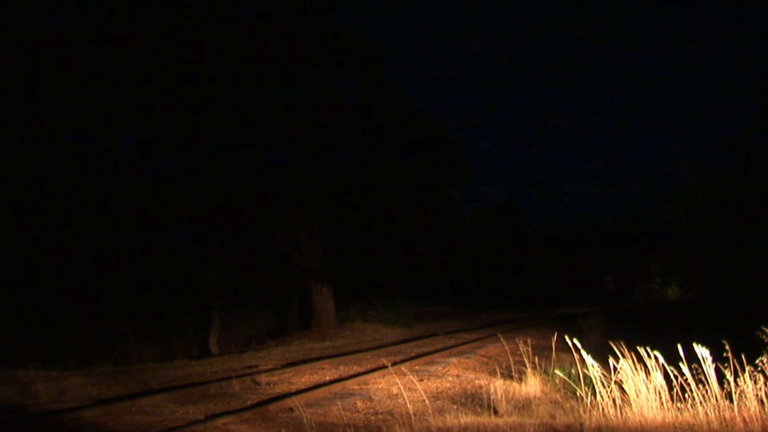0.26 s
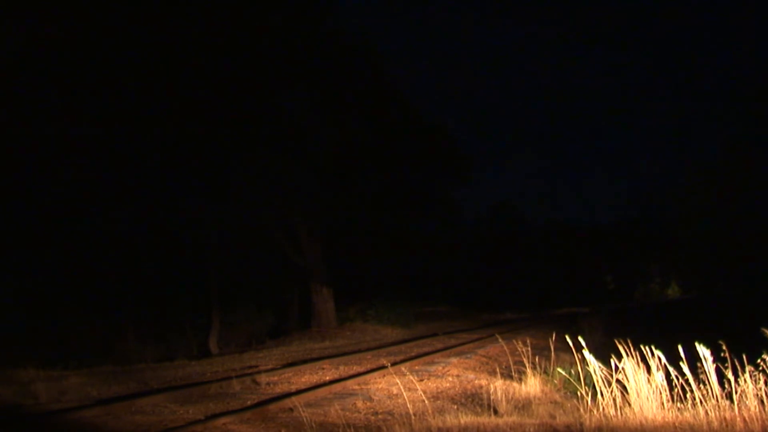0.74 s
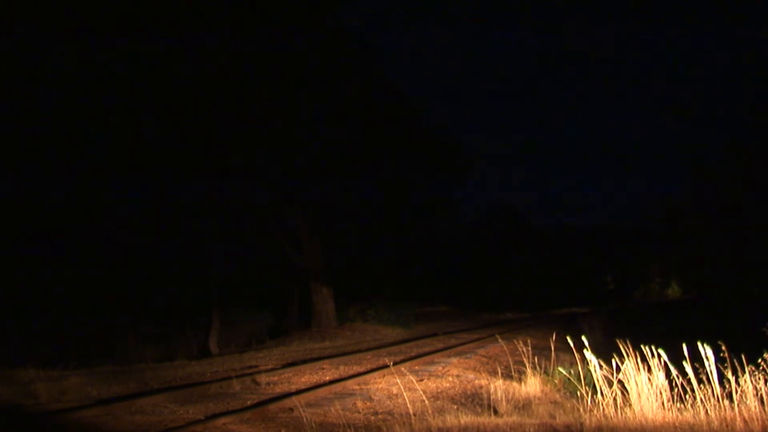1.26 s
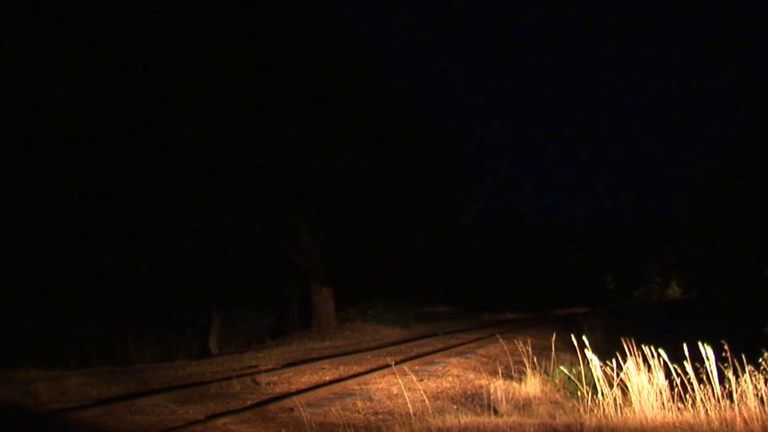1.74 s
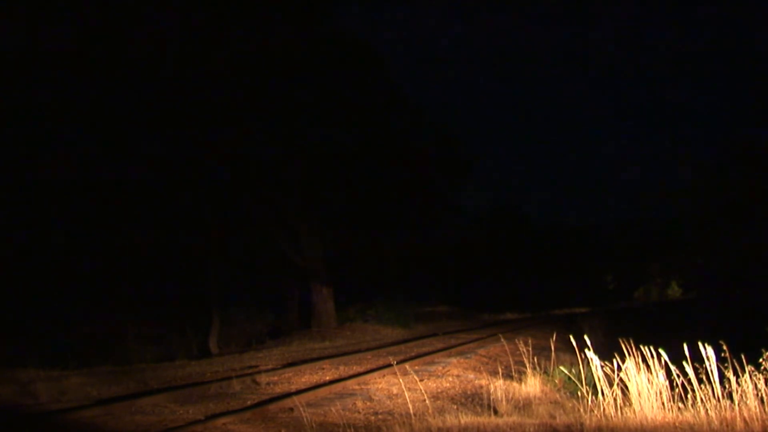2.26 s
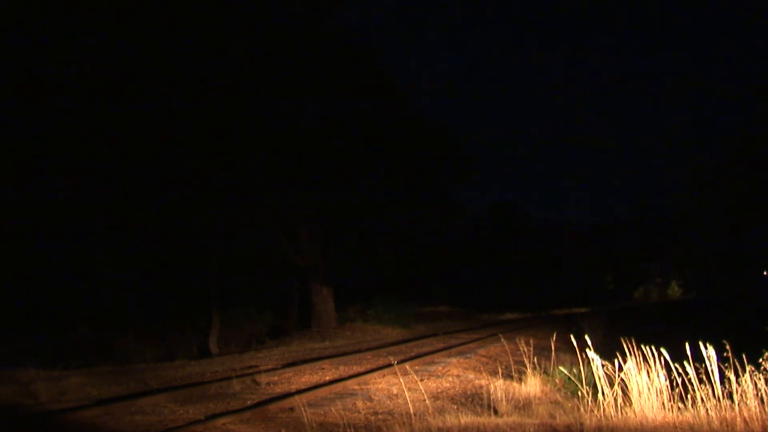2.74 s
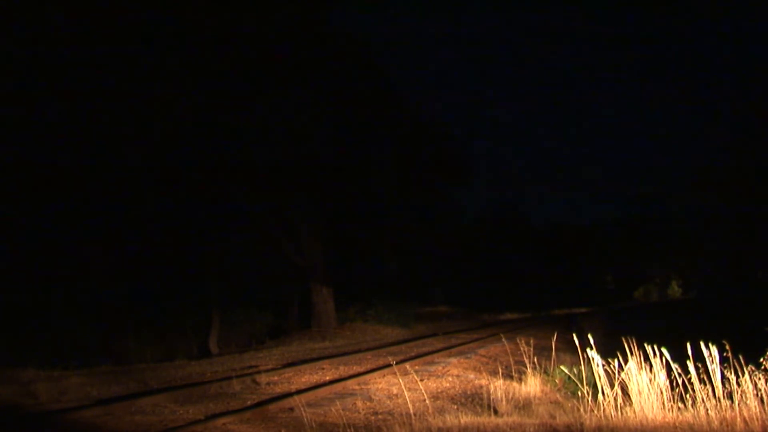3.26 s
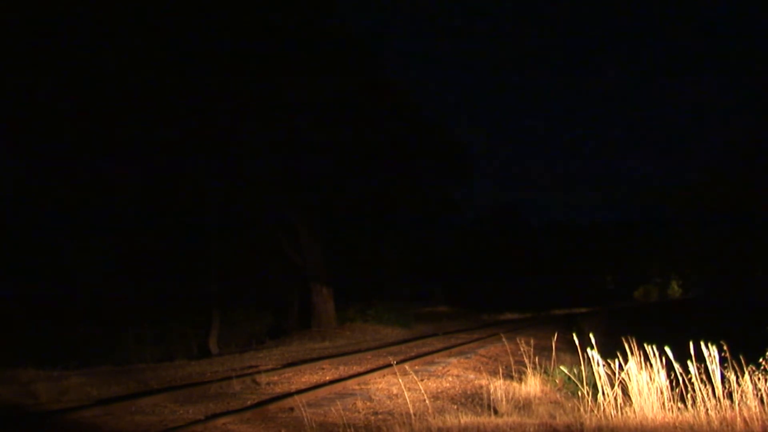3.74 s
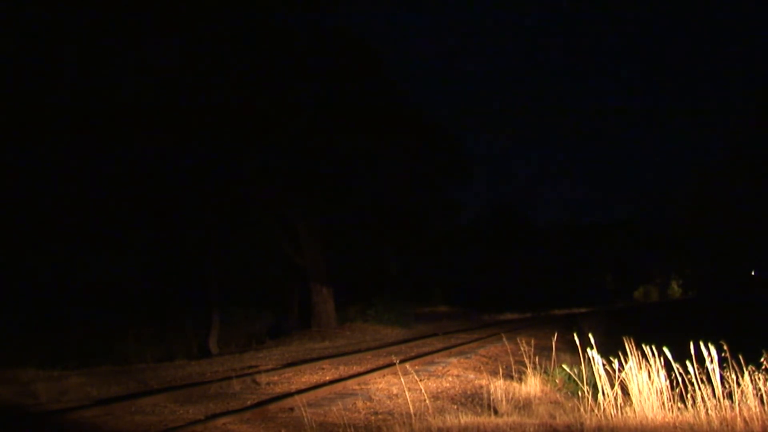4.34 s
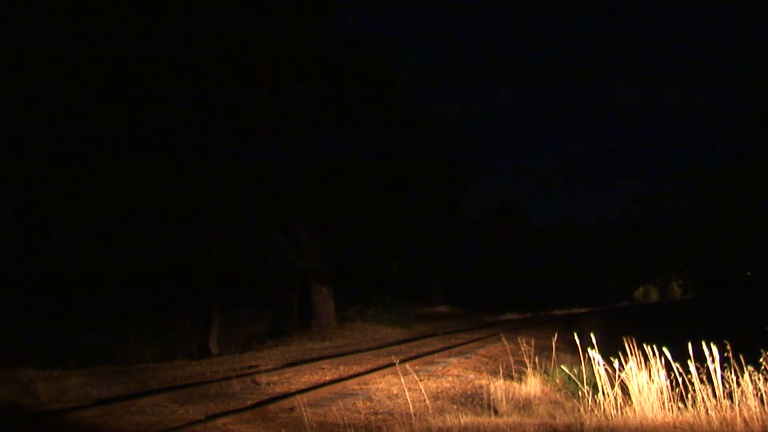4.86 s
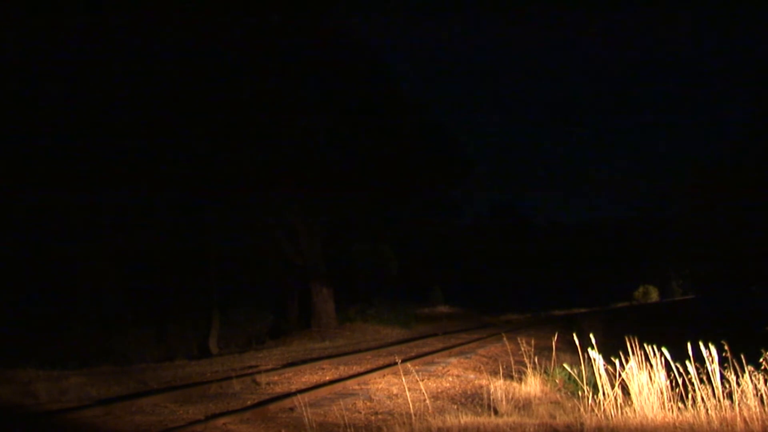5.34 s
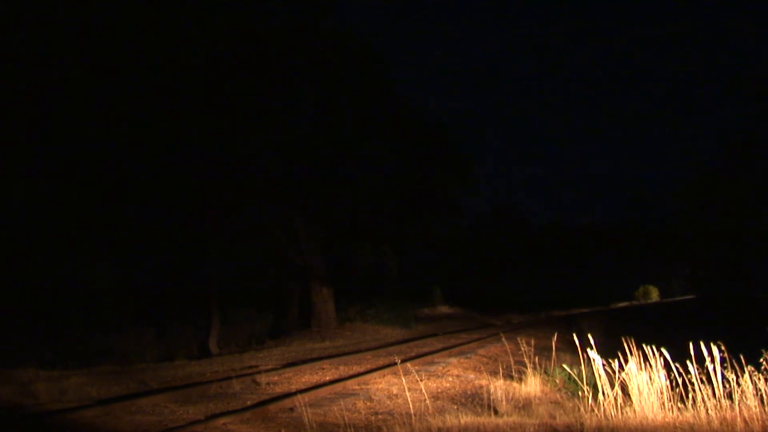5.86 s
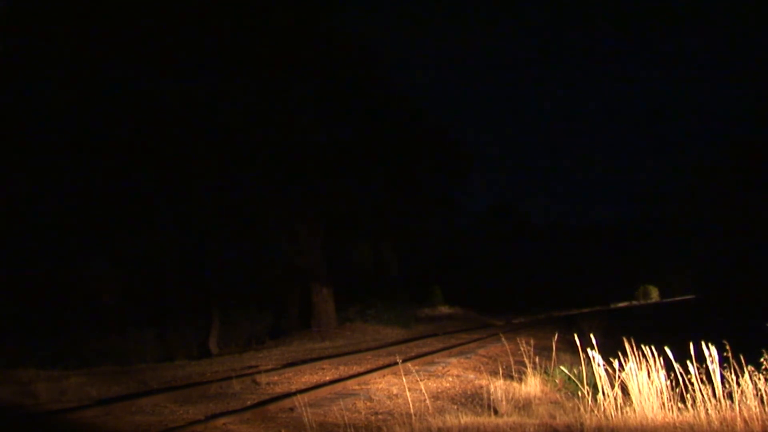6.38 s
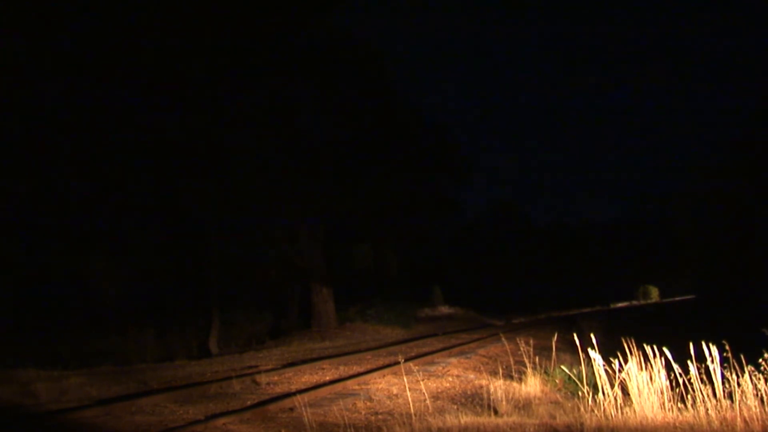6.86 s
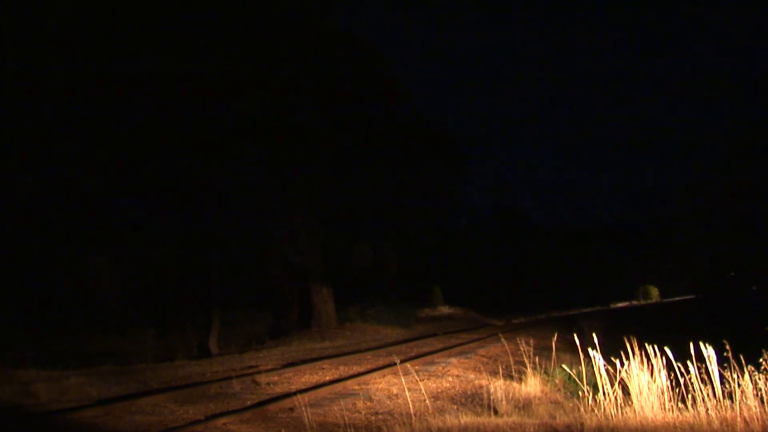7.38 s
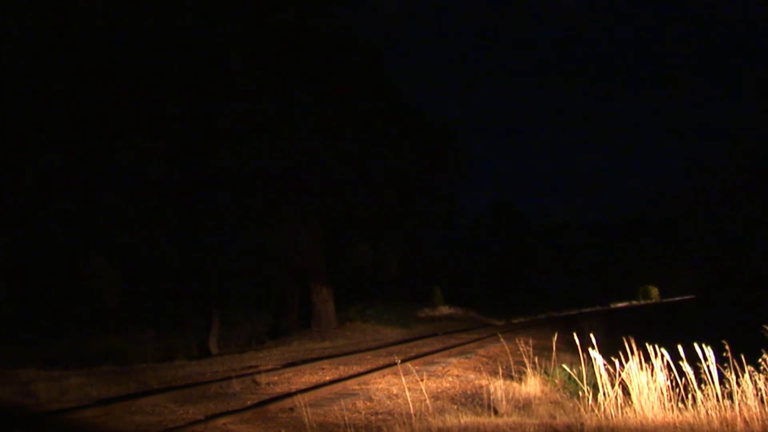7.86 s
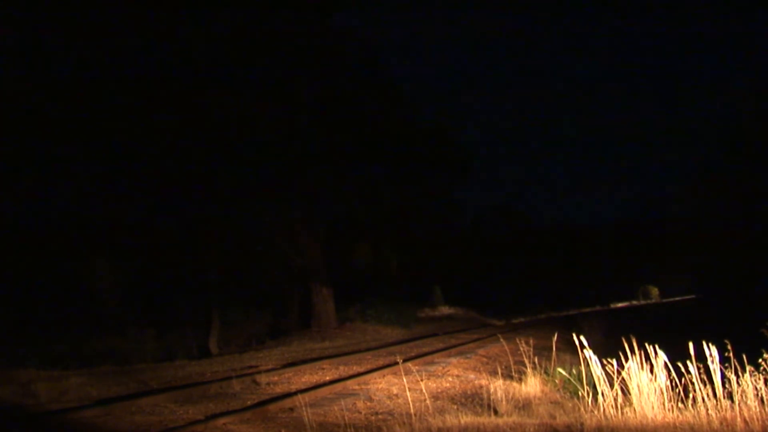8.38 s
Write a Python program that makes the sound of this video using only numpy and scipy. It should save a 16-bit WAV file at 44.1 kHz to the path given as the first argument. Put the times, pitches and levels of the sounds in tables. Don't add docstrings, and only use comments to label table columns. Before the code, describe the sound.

Low locomotive engine rumble swells and clatters, steadies to a heavy throb, and ends with one brief, loud air horn echoing off trees.

```python
import sys
import numpy as np
from scipy import signal
from scipy.fft import rfft, irfft, next_fast_len
from scipy.io import wavfile
from scipy.ndimage import uniform_filter1d

SR = 44100
rng = np.random.default_rng(int(sys.argv[2]) if len(sys.argv) > 2 else 0)


def pcm_store(signal):
    levels = np.round(np.clip(np.atleast_2d(signal), -1, 1) * 32767)
    wavfile.write(sys.argv[1], SR, levels.astype(np.int16).T)


def volts_from_db(level):
    exponent = np.asarray(level, float) / 20
    return 10 ** exponent


N = 380141
T = np.arange(N) / SR
SIZE = next_fast_len(N + 9000)
HZ = np.arange(SIZE // 2 + 1) * SR / SIZE + 1e-3
RUNNING_HZ = 10.83
VALVE_OPENS_S = 7.984


def rms_one(x):
    return x / np.sqrt(np.mean(x ** 2) + 1e-20)


def in_time(rows):
    return np.interp(T, *np.transpose(rows))


def at_hz(points, hz):
    point_hz, point_db = np.transpose(points)
    return np.interp(np.log(hz), np.log(point_hz), point_db)


def drift(rate):
    r = np.exp(-80 * np.pi * rate / SR)
    slow = signal.lfilter([1], [1, -2 * r, r * r], rng.standard_normal(N // 40 + 2002))[2000:]
    return np.interp(np.arange(N) / 40, np.arange(len(slow)), rms_one(slow - slow.mean()))


def filtered(x, response):
    return irfft(rfft(x, SIZE) * response, SIZE)[..., :N]


def bandpass(x, low_hz, high_hz):
    return signal.sosfilt(signal.butter(2, [low_hz, high_hz], "band", fs=SR, output="sos"), x)


def resonances(rows):
    return [(db, 1 + (2 * (HZ - hz) / width_hz) ** 2) for hz, width_hz, db in rows]


def noise(spectrum, patchy_db, shared_db, count):
    low, high = np.log(spectrum[0][0]), np.log(spectrum[-1][0])
    place = (np.log(HZ) - low) / (high - low) * (count - 1)
    white = rfft(rng.standard_normal((2, SIZE))) * volts_from_db(at_hz(spectrum, HZ))
    together = drift(5.0) + 0.54 * drift(36.0)
    out = 0
    for k in range(count):
        band = irfft(white * np.clip(1 - abs(place - k), 0, 1), SIZE)[:, :N]
        apart = 0.5 * drift(2.58) + drift(17.0)
        out = out + band * volts_from_db(patchy_db * apart + shared_db * together)
    return rms_one(out)


def bursts(events, fall_s, over_db, rise_s):
    clicks = np.zeros(N)
    clicks[[round(s * SR) for s, db in events]] = volts_from_db(np.array(events)[:, 1] + over_db)
    fall = signal.lfilter([1], [1, -np.exp(-1 / (fall_s * SR))], clicks + 1e-18)
    r = np.exp(-1 / (rise_s * SR))
    return signal.lfilter([1 - r], [1, -r], fall)


def engine():
    # time_s, cycles_hz
    cycle = [(0.0, 8.703), (0.8, 8.781), (1.3, 8.526), (1.8, 8.466), (2.1, 8.769), (3.4, 10.907),
             (3.75, 11.282), (4.1, 11.26), (4.9, 10.843), (5.25, 10.798), (6.0, 10.847), (8.62, 10.819)]
    # time_s, over_steady_running_db
    effort = [(0.0, -5.5), (0.35, -8), (1.0, -11.5), (1.7, -9.5), (2.15, -4), (2.6, 1.5), (2.9, 3),
              (3.4, 6), (3.9, 2.5), (4.2, -1), (4.9, -2), (5.4, 1), (6.3, 0.9), (7.2, 0.5), (8.62, 2.5)]
    speed, effort_db = in_time(cycle), in_time(effort)
    throttle_s = 0.8
    span = int(throttle_s * SR / 2)
    surge = uniform_filter1d(uniform_filter1d(np.gradient(speed) * SR, span), span)

    def layer_db(steady_db, per_effort_db, per_hz_db, per_surge_db):
        return steady_db + per_effort_db * effort_db + per_hz_db * (speed - RUNNING_HZ) + per_surge_db * surge

    load_db = layer_db(0.21, 0.44, -0.89, 1.2)
    load_db = load_db - 8 * np.clip(speed - RUNNING_HZ, 0, None)
    rumble_db = layer_db(-47.5, 0.44, 0.3, -0.6)
    roar_db = layer_db(-47.5, 0.41, 1.8, -0.53)
    clatter_db = layer_db(-48, 0.96, 0.06, 0.01)
    strain = volts_from_db(-48.5 + effort_db) * np.clip(surge, 0, None) ** 0.57

    turn = 2 * np.pi * np.cumsum(speed) / SR + np.pi
    tones = exhaust(speed, turn, load_db) + knocks(speed, turn, roar_db) + strain * bark(speed)
    return tones, rumble(rumble_db) + roar(roar_db) + clatter(clatter_db)


def exhaust(speed, turn, load_db):
    # cycle_multiple, rms_db
    slow_orders = [(2, -92.5), (3, -69.5), (4, -62.5), (5, -68.5), (6, -46), (7, -52.5), (8, -70.5),
                   (9, -42), (10, -50.5), (11, -63.5), (12, -68), (13, -63.5), (14, -55.5), (15, -65.5),
                   (16, -65), (17, -78), (18, -64), (19, -69), (20, -68), (21, -68), (22, -71.5)]
    # cycle_multiple, rms_db
    fast_orders = [(2, -68), (3, -60), (4, -56), (5, -53), (6, -41.5), (7, -48), (8, -46.5), (9, -46),
                   (10, -42.5), (11, -62), (12, -63), (13, -64), (14, -54.5), (15, -54), (16, -70),
                   (17, -66), (18, -55), (19, -72), (20, -60), (21, -68), (22, -72)]
    fast = np.clip((speed - 9.6) / (11.0 - 9.6), 0, 1)
    out = 0
    for (k, slow_db), (_, fast_db) in zip(slow_orders, fast_orders):
        order_db = slow_db + fast * (fast_db - slow_db) + load_db + 1.47 * drift(0.98)
        if 4.5 < k < 10.5:
            lag = 0.5 + (k in (8, 10))
        else:
            lag = 2.7 + (2 * np.pi if k > 10.5 else 0.2) * rng.random()
        out = out + volts_from_db(order_db) * np.cos(round(k) * turn - lag + 0.27 * drift(1.0))
    return np.sqrt(2) * out


def knocks(speed, turn, roar_db):
    # cycle_multiple, rms_db
    knock_orders = [(23, -80.5), (33, -68.5), (34, -59), (36, -71.5), (39, -66.5), (40, -57.5), (42.5, -64),
                    (50, -76.5), (65, -77.5), (75, -58), (104, -63), (110, -64), (128, -59.5), (158, -60.5),
                    (196, -78), (273, -65.5)]
    out = 0
    for k, knock_db in knock_orders:
        waver = 0.34 * np.sqrt(k) * drift(2.5)
        blur_db = (k > 60) * -12 * abs(speed - RUNNING_HZ)
        order_db = knock_db + blur_db + roar_db + 48 + 2.95 * drift(1.4)
        out = out + volts_from_db(order_db) * np.cos(round(2 * k) / 2 * turn + waver)
    return np.sqrt(2) * out


def bark(speed):
    # centre_hz, width_hz, peak_db
    pipe = [(131, 18, -15.5), (235, 56, 3), (422, 38, 6.5), (680, 110, -3.5), (1760, 200, -9),
            (2200, 350, -6), (3020, 850, -17)]
    pattern = rng.standard_normal(600)
    place = np.cumsum(speed) / SR % 1 * len(pattern)
    rough = np.interp(place, np.arange(len(pattern)), pattern) + 0.5 * rng.standard_normal(N)
    return rms_one(filtered(rough, sum(volts_from_db(db) / spread for db, spread in resonances(pipe))))


def rumble(rumble_db):
    # freq_hz, density_db
    colour = [(16, -44.5), (25, -14.5), (45, -8.5), (80, -5.5), (120, -5), (170, -13), (250, -18.5),
              (330, -20.5), (500, -50)]
    return volts_from_db(rumble_db + 4.5) * noise(colour, patchy_db=-0.5, shared_db=-1.0, count=5)


def roar(roar_db):
    # freq_hz, density_db
    colour = [(200, -29), (330, 3.5), (450, -3), (800, -4), (1200, -9), (1500, -5), (2000, -19.5)]
    return volts_from_db(roar_db + 4.5) * noise(colour, patchy_db=1.5, shared_db=-0.43, count=6)


def clatter(clatter_db):
    # freq_hz, density_db
    colour = [(900, -43.5), (1400, -10.5), (1600, -0.5), (1800, -5.5), (2200, -2), (3000, -7), (3500, -10),
              (4000, -15), (4500, -20.5), (5050, -20), (5400, -32), (6000, -37), (6700, -45), (9000, -74)]
    # start_s, peak_db
    clanks = [(2.2094, -43), (2.3794, -31), (2.8095, -29), (3.04, -49), (3.3842, -42), (3.4825, -27),
              (3.6566, -21), (4.3645, -31), (5.4665, -33), (5.7438, -33), (6.1135, -35), (6.2971, -31),
              (6.4834, -28), (7.0356, -29), (7.2519, -46), (7.7794, -28), (7.9603, -32)]
    strength = volts_from_db(clatter_db) + bursts(clanks, fall_s=0.0096, over_db=-14.0, rise_s=0.0072)
    return strength * noise(colour, patchy_db=1.2, shared_db=1.16, count=7)


def ridge(width_hz):
    # strongest_s, centre_hz, slide_hz_per_s, rms_db, swell_s
    slides = [(3.05, 2300, -250, -53, 0.25), (3.92, 1790, -260, -47.5, 0.25),
              (6.55, 1200, -110, -50.5, 0.37), (3.85, 1180, -120, -52, 0.25), (3.2, 740, 40, -52, 0.3)]
    low = signal.butter(2, width_hz / 2, fs=SR, output="sos")
    slow = signal.sosfilt(low, rng.standard_normal((2, N)))
    out = 0
    for s, hz, slide, db, swell_s in slides:
        turn = 2 * np.pi * (hz + slide * (T - s) / 2) * (T - s)
        swell = np.exp(-0.5 * ((T - s) / swell_s) ** 2)
        out = out + volts_from_db(db) * swell * rms_one(slow[0] * np.cos(turn) + slow[1] * np.sin(turn))
    return out


def horn():
    # pitch_hz, harmonics_db (1, 2, 3 .. against the voice
    trumpets = [
        (426, [-7.5, 1.5, -8, -15.5, -20, -21, -22, -28.5, -38, -50.5, -56.5, -40.5, -53.5, -54.5, -64, -62]),
        (545, [4.5, 2.5, -5.5, -12, -14, -19.5, -25.5, -36, -38, -56.5, -55, -64.5]),
        (562, [5.5, 2.5, -2, -9, -10, -16.5, -22, -28.5, -35, -40, -48, -54.5]),
    ]
    # attack_s, full_db, sag_db_per_s while blown, shut_s, echo_db
    voices = [
        (0.015, -24.5, -40, 8.185, -32.5),
        (0.013, -14.5, 42, 8.27, -37),
        (0.018, -22, 41, 8.27, -41.5),
        (0.017, -28.5, 3, 8.28, -34.5),
    ]
    start = round(7.9 * SR)
    t = T[start:]
    since = np.clip(t - VALVE_OPENS_S, 0, None)
    sag = 0.997 + 0.036 * np.exp(-since / 0.045)
    levels_db = [blown(t, *voice, fall_db_per_s=33.5) for voice in voices[:-1]]
    ground_db = blown(t, *voices[-1], fall_db_per_s=13)
    echoes = np.clip((t - 8.2) / 0.082, 0, 1)
    tilt_db = 0.62 - 2.4 * np.exp(-since / 0.045) - 0.4 * echoes
    out = 0
    for (pitch_hz, harmonics_db), voice_db in zip(trumpets, levels_db):
        air = bandpass(rng.standard_normal(len(t)), 20, 300)
        turn = 2 * np.pi * np.cumsum(pitch_hz * sag * (1 + 0.003 * drift(30.0)[start:])) / SR
        turn += 0.04 * rms_one(air)
        for k, db in enumerate(harmonics_db):
            base_db = ground_db if k == 0 and pitch_hz > 500 else voice_db + tilt_db * abs(k - 1)
            flutter_db = ((1.03 + 0.24 * k) * (k != 1) + 2.5 * echoes) * drift(10.4)[start:]
            paths = 2 * np.pi * rng.random() + (0.35 + 0.59 * echoes) * drift(7.0)[start:]
            out = out + volts_from_db(base_db + db + flutter_db) * np.cos((k + 1) * turn + paths)
    out = np.sqrt(2) * np.clip(since / 0.0085, 0, 1) * out
    bent = bandpass(out ** 2, 700, 4200)
    top_lost = signal.butter(8, 5500, fs=SR, output="sos")
    far = signal.sosfilt(top_lost, out + 0.45 * bent)
    return np.r_[np.zeros(start), far]


def blown(t, attack_s, full_db, sag_db_per_s, shut_s, echo_db, fall_db_per_s):
    since = np.clip(t - VALVE_OPENS_S, 0, None)
    after = np.clip(t - shut_s, 0, None)
    swell_db = -48.5 * np.exp(-since / attack_s)
    direct_db = full_db - sag_db_per_s * (since - after) - 168 * after
    linger_db = echo_db - fall_db_per_s * after
    return swell_db + 10 * np.log10(volts_from_db(2 * direct_db) + volts_from_db(2 * linger_db))


def woods(x, wet_db, onset_s):
    # freq_hz, decay_s
    tail_t60 = [(300, 2.3), (1000, 1.2), (2500, 1.77), (7000, 1.3)]
    t, out = np.arange(SR) / SR, 0
    corners_hz = np.array(tail_t60)[:, 0]
    for low, high in zip(corners_hz, corners_hz[1:]):
        band = bandpass(rng.standard_normal((2, SR)), low, high)
        out = out + band * volts_from_db(-60 * t / at_hz(tail_t60, np.sqrt(low * high)))
    out = out * np.clip(t / onset_s, 0, 1) * volts_from_db(wet_db)
    return signal.fftconvolve(x[None], out, axes=1)[:, :N]


def arrive(direct, scattered):
    # centre_hz, width_hz, depth_db
    notches = [(320, 61, -13.5), (576.6, 164, -11.5), (921, 86, -9), (1349, 81, -9), (1549, 143, -9.5)]
    # freq_hz, share_db
    scatter = [(30, -17.5), (200, -20), (400, -17), (800, -12.5), (1400, -9), (2500, -18.5), (3500, -13.5),
               (4200, -23.5), (6000, 9.5)]
    # freq_hz, left_minus_right_db
    left_more = [(60, .3), (160, .5), (250, 1.2), (410, -.5), (660, -3), (1070, -4), (1730, -4), (2800, -1),
                 (3900, 3.5), (4520, 1.5), (5200, -1)]
    # freq_hz, left_lead_rad
    left_lead = [(30, 0), (250, -.1), (500, -.5), (860, -.8), (1290, -.3), (1640, .3), (2580, -.2),
                 (3620, -.3), (3960, -.6), (4400, -2.0), (5100, -1.7), (6000, -1.0)]
    dips_db = sum(db / spread for db, spread in resonances(notches))
    ports = np.array([[0.5], [-0.5]])
    pair = volts_from_db(ports * at_hz(left_more, HZ))
    lead = np.exp(1j * ports * at_hz(left_lead, HZ))
    front = filtered(direct, volts_from_db(dips_db) * pair * lead)
    sides = filtered(scattered, volts_from_db(at_hz(scatter, HZ)) * pair * 2 * ports)
    return front + sides


def camera():
    # start_s, peak_db
    ticks = [(2.209, -72), (4.449, -74), (4.649, -58), (5.469, -74), (6.571, -70)]
    common, apart = rng.standard_normal((2, N))
    hiss = volts_from_db(-81.5 + 5.0) * (0.91 * common + 1.1 * apart * np.array([[1], [-1]]))
    whine = volts_from_db(-95 + 2.5 * drift(5.0)) * np.sin(2 * np.pi * 11500 * T)
    high = signal.butter(2, 3600, "high", fs=SR, output="sos")
    crack = signal.sosfilt(high, rng.standard_normal((2, N)))
    return hiss + whine + crack * bursts(ticks, fall_s=0.012, over_db=3, rise_s=0.002)


def scene():
    tones, body = engine()
    blast = horn()
    tail = woods(blast, wet_db=-47, onset_s=0.025)
    direct = tones + body[0] + blast + tail[0] + ridge(width_hz=160)
    return arrive(direct, body[1] + volts_from_db(8.5) * tail[1]) + camera()


def top_cut(x):
    return signal.sosfilt(signal.butter(12, 13650, fs=SR, output="sos"), x)


def record(dry):
    soft = 3.856 * np.tanh(dry / 4.155)
    return top_cut(soft)


dry = scene()
out = record(dry)
pcm_store(out)
```